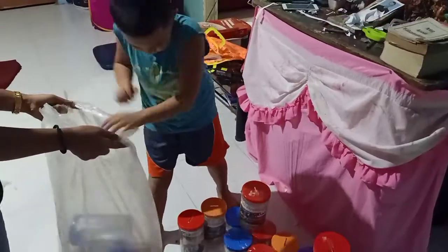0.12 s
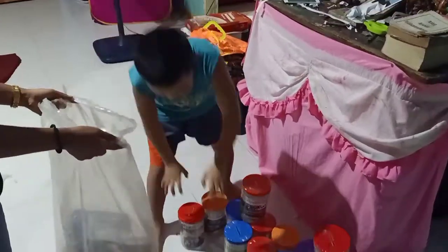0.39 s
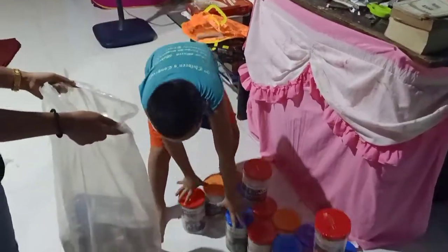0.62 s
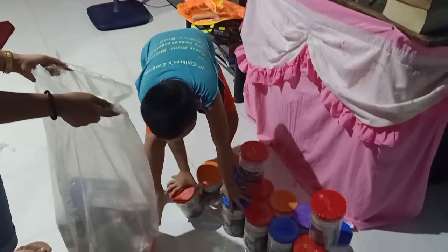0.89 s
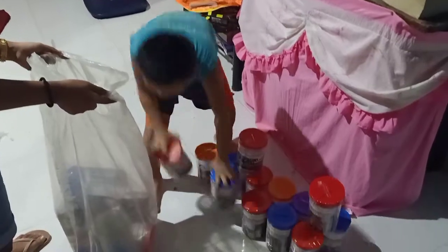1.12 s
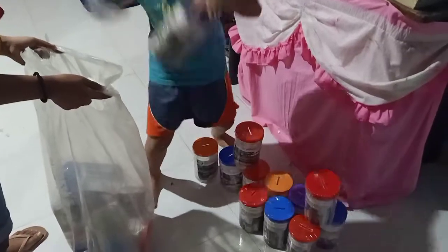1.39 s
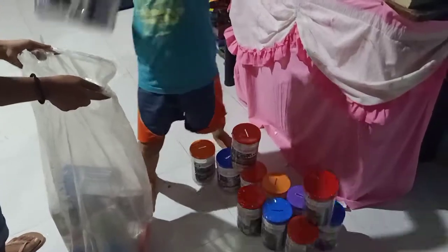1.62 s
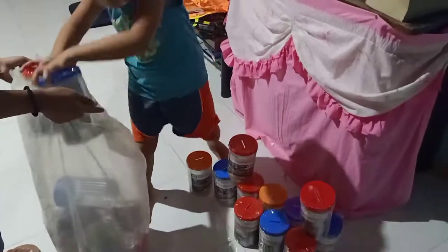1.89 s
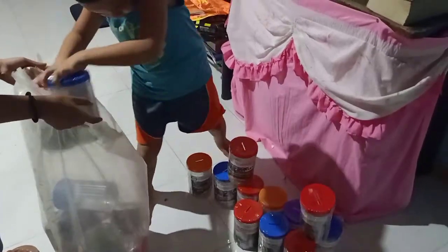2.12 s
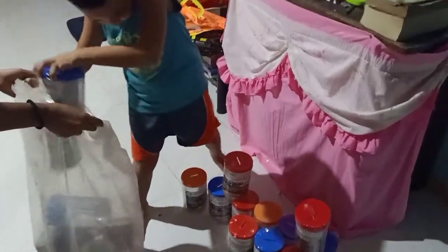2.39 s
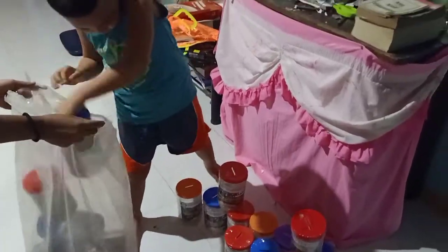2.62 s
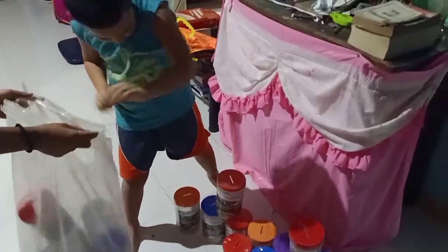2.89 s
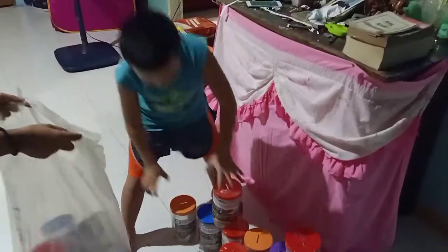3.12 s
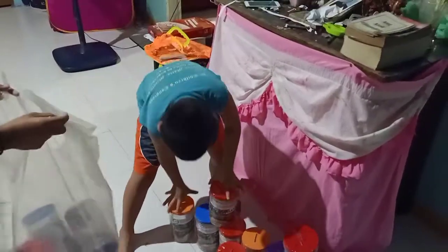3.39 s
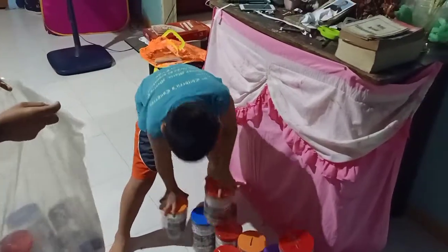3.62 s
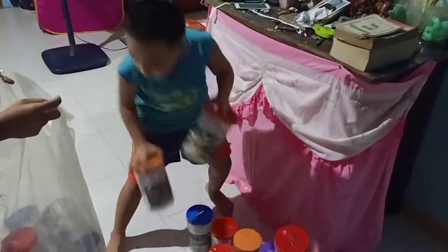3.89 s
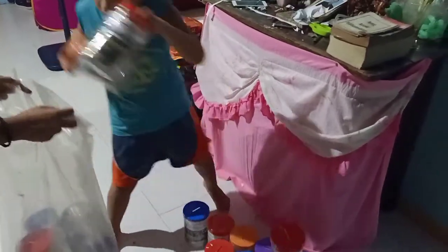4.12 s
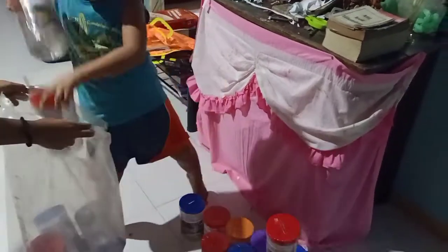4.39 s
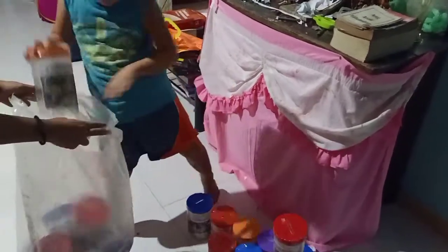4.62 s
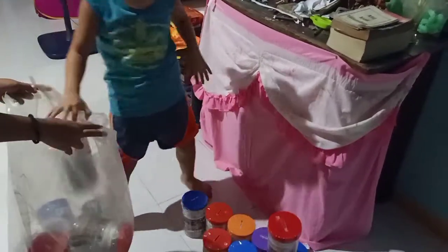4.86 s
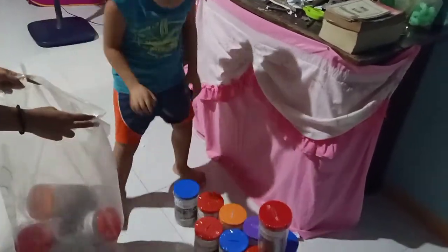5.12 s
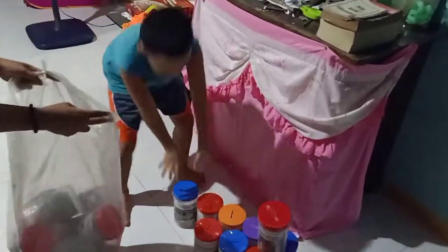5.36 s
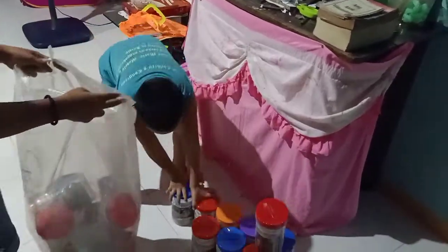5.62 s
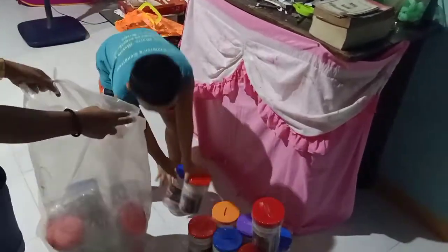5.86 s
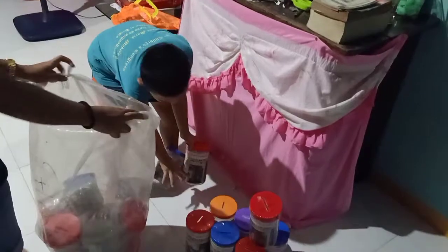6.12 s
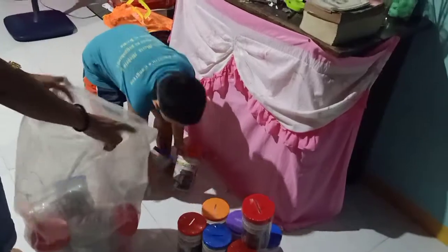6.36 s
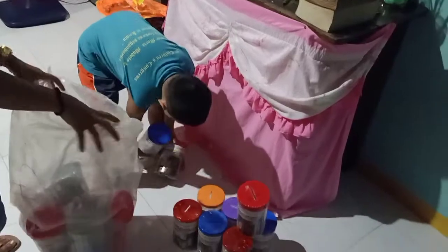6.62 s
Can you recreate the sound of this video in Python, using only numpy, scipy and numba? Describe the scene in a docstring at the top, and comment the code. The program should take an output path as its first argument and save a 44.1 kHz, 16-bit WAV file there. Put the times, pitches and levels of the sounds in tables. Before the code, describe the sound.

Hollow plastic knocks come in uneven clusters as lidded jars drop into a rustling bag indoors, with short rattles and soft floor thuds.

```python
"""A fan hisses far off and a thin plastic bag crackles; then empty plastic jars, picked up from a tiled floor,
knock as they are dropped into the bag in a bare room. Each knock excites damped air, wall and lid modes and a
crack of noise; touching jars hum through a gliding resonator, and the film is filtered random clicks.
The load and bare feet push low swells from the floor; decaying noise makes the room.
A hand cups the left microphone port and shifts its grip, moving a resonance and shading the treble."""
import sys
import numpy as np
from scipy import signal
from scipy.fft import rfft, irfft
from scipy.io import wavfile
from scipy.ndimage import uniform_filter1d
from numba import njit

SR = 44100
rng = np.random.default_rng(int(sys.argv[2]) if len(sys.argv) > 2 else 0)


def amplitude_ratio(level_db):
    """Convert a level in decibels to the matching linear amplitude (field) ratio."""
    exponent = np.asarray(level_db, float) / 20
    return 10 ** exponent


def store_wav(level_fs):
    """Save 16-bit WAV to argv[1]."""
    pcm = np.round(np.clip(np.atleast_2d(level_fs), -1, 1) * 32767)
    wavfile.write(sys.argv[1], SR, pcm.T.astype(np.int16))


N = 297454

# Blows on the jars. Each row: start in seconds, level in dB, pitch of the hollow air ring in Hz,
# wall pitch in Hz, hardness as the level of the crack relative to the blow in dB.
BLOWS = [(0.148, -15, 624, 990, 0.5), (0.15, -18, 311, 623, -4), (0.169, -20, 363, 1020, -20),
         (0.187, -13.5, 412, 1247, -9.5), (0.22, -20.5, 417, 497, 2), (0.273, -20, 417, 880, -10),
         (0.387, -36.5, 462, 580, 19), (0.428, -24, 273, 703, 2), (0.831, -40.5, 290, 1100, -11),
         (1.074, -37.5, 323, 579, -18), (1.116, -29, 339, 600, -6), (1.141, -28.5, 325, 495, -9),
         (1.17, -17.5, 331, 520, -7), (1.199, -20, 341, 520, -8), (1.226, -27.5, 351, 760, -9),
         (1.252, -21, 349, 513, -8), (1.295, -34, 330, 766, -1), (1.338, -33, 334, 760, -25),
         (1.824, -28, 413, 710, 0.5), (2.097, -30, 788, 1080, -4), (2.468, -33.5, 402, 493, -22),
         (2.64, -26, 440, 1026, 16), (2.659, -26.5, 398, 547, 12.5), (2.98, -28, 613, 760, 6),
         (3.001, -24, 392, 545, -3), (3.058, -35, 410, 495, 6.5), (3.262, -37.5, 372, 1120, 6.5),
         (3.4, -37, 396, 490, -7), (3.46, -35, 325, 970, -11), (3.578, -29.5, 340, 536, -2),
         (3.618, -27.5, 356, 494, -29), (3.72, -26, 299, 590, -14), (3.746, -33.5, 353, 570, 1),
         (3.807, -48, 333, 1140, -1), (4.247, -40, 302, 500, 0), (4.289, -16.5, 980, 685, 4),
         (4.295, -17, 397, 990, 2.5), (4.337, -22.5, 271, 937, 16), (4.356, -17.5, 396, 1090, -25),
         (4.72, -23.5, 392.5, 944, 5.5), (4.729, -14.5, 419, 1207, -1.5), (5.03, -14, 369, 580, -9),
         (5.066, -10, 422, 487, -1), (5.076, -19, 420, 500, -11), (5.088, -17, 354, 493, -28),
         (5.126, -19.5, 358, 503, -17), (5.1927, -6.5, 893, 996, -4.5), (5.194, -25, 418, 580, 7.5),
         (5.202, -11, 423.4, 827, -27), (5.222, -18, 362, 1057, -8), (5.251, -23, 415, 580, -15),
         (5.484, -16.5, 392, 748, -5), (5.839, -22, 385, 850, 6), (5.846, -9, 379, 1140, -12.5),
         (6.168, -30, 357, 550, -2.5), (6.262, -38, 356, 595, -11), (6.439, -7.5, 418, 540, -10),
         (6.442, -21, 534, 1017, -16), (6.459, -12.5, 404.5, 535, -20), (6.642, -26, 371, 532, 3)]


def rms_one(x):
    """Normalization: divides a signal by its root mean square."""
    return x / np.sqrt(np.mean(x ** 2) + 1e-20)


def in_time(rows):
    """Linear interpolation: reads the columns of a timed curve at every sample."""
    s, *columns = np.transpose(rows)
    return [np.interp(np.arange(N) / SR, s, column) for column in columns]


def at_hz(points, hz):
    """Logarithmic frequency scale: interpolates a spectrum evenly per octave."""
    points_hz, values = np.transpose(points)
    return np.interp(np.log(hz + 1), np.log(points_hz), values)


def convolve(x, response):
    """Linear superposition: convolves with an impulse response, cut to the scene's length."""
    return signal.fftconvolve(np.atleast_2d(x), np.atleast_2d(response), axes=1)[:, :N]


def colour(x, spectrum):
    """Minimum phase: folding the cepstrum gives a causal filter with the wanted magnitude."""
    level_db = at_hz(spectrum, np.fft.rfftfreq(4096, 1 / SR))
    cepstrum = irfft(np.log(amplitude_ratio(level_db)))
    cepstrum[1:2048] *= 2
    cepstrum[2049:] = 0
    return convolve(x, irfft(np.exp(rfft(cepstrum))))


def drift(rate_hz):
    """Low-pass random process: a double pole leaves slow wandering of spread 1."""
    pole = np.exp(-80 * np.pi * rate_hz / SR)   # computed at every 40th sample
    noise = rng.standard_normal(N // 40 + 2002)
    slow = signal.lfilter([1], [1, -2 * pole, pole * pole], noise)[2000:]
    return np.interp(np.arange(N) / 40, np.arange(len(slow)), rms_one(slow))


def grains(per_s, spread_db):
    """Poisson-like impulses: random clicks with exponential sizes in dB, scaled to rms 1."""
    sizes = amplitude_ratio(spread_db * np.minimum(rng.exponential(1, N), 4.0)) * rng.choice([-1, 1], N)
    return rms_one(sizes * (rng.random(N) < per_s / SR))


def stereo(mid, side):
    """Interchannel coherence: sum and difference of unrelated signals set the likeness per band."""
    # Left-right likeness. Each row: frequency in Hz, correlation from -1 to 1.
    likeness = [(60, 0.69), (200, 0.96), (400, 0.96), (640, 0.27), (1000, 0.38), (1400, -0.35),
                (3000, 0.031)]
    alike = np.clip(at_hz(likeness, np.fft.rfftfreq(len(mid), 1 / SR)), -1, 1)
    mid = rfft(mid) * np.sqrt(1 + alike)
    side = rfft(side) * np.sqrt(1 - alike)
    return irfft([mid + side, mid - side]) / np.sqrt(2)


def bursts(rows, rise_db_per_s):
    """Exponential envelopes: each row rises up to its moment, holds, then falls at its own rate."""
    t = np.arange(0, N + 32, 32) / SR   # every 32nd sample
    s, held, db, dies = np.transpose(rows)[:4, :, None]
    rise = rise_db_per_s * np.maximum(s - t, 0)
    fall = dies * np.maximum(t - s - held, 0)
    return amplitude_ratio(db - rise - fall)


def per_sample(v):
    """Linear interpolation: from every 32nd sample to every sample."""
    return np.interp(np.arange(N) / 32, np.arange(len(v)), v)


def modes(table, hz, draw, t, spread_db, detune):
    """Modal superposition: dying sines, of varied strength and pitch above the first mode."""
    total = 0
    for k, (ratio, level_db, t60) in enumerate(table):
        varied = k > 0
        envelope = amplitude_ratio(level_db + spread_db * varied * draw[k] - 60 * t / t60)
        mode_hz = ratio * hz * (1 + detune * varied * draw[-k])
        total = total + envelope * (-1) ** k * np.sin(2 * np.pi * mode_hz * t)
    return total


@njit
def moving_ring(clicks, hz, radius, rate):
    """Two-pole resonance: a damped oscillator whose pitch may move."""
    out = np.zeros(len(clicks))
    for i in range(2, len(clicks)):
        turn = 2 * radius * np.cos(2 * np.pi * hz[i] / rate)
        out[i] = clicks[i] + turn * out[i - 1] - radius ** 2 * out[i - 2]
    return out


def resonance(x, hz, width_hz):
    """Band-pass resonance: a pole pair of gain 1 on top, whose centre may move."""
    r = np.exp(-np.pi * width_hz / SR)
    driven = signal.lfilter([(1 - r * r) / 2, 0, (r * r - 1) / 2], [1], x)
    return moving_ring(driven, hz + np.zeros(N), r, SR)


def fan():
    """Broadband flow noise: far, smooth air noise with a slight drift in level."""
    # Fan spectrum. Each row: frequency in Hz, level in dB.
    spectrum = [(30, 7), (100, -1), (200, -3.5), (500, -2), (1200, -4.5), (2400, -1.5), (4000, -7.5),
                (6000, -15), (9000, -10.5), (16000, -21)]
    air = colour(stereo(*rng.standard_normal((2, N))), spectrum)
    return amplitude_ratio(-45 + 0.22 * drift(0.81)) * rms_one(air)


def bag():
    """Crackling as impulsive noise: film snaps in clumped clicks, wide folds lower, heavy creases duller."""
    # Film pulled, shaken or brushed. Each row: moment of full level in seconds, hold in seconds,
    # crackle in dB, fall in dB per second, wide folds relative to the crackle in dB.
    pulls = [(0, 0.1, -42.5, 612, 8.5), (0.154, 0.0057, -38, 496.5, 9), (0.189, 0.0065, -33.5, 300, 14),
             (.24, 0.0085, -38.5, 168, 12), (0.39, 0.0027, -29, 800, 9.5), (.42, .09, -52.5, 190, 11),
             (1.125, .02, -55, 100, 17), (1.837, 0.24, -43.5, 250, 7.5), (2.2, 0.22, -48, 9, 8),
             (2.645, .12, -45.5, 226, 14.5), (2.91, .06, -45.5, 202, 7), (2.983, 0.0029, -39, 232, 10.5),
             (3.079, .005, -38.5, 400, 13.5), (3.12, 0.14, -47, 100, 10.5), (3.25, 0.16, -46, 97, 12),
             (3.399, 0.024, -41.5, 103, 12), (3.588, 0.0067, -40, 161, 9.5), (3.813, .005, -47.5, 132, 12),
             (4.19, .05, -55, 100, 13.5), (4.27, 0.045, -46.5, 200, 14), (4.345, .005, -46, 53, 6),
             (4.62, 0.11, -49.5, 100, 8), (4.73, 0.054, -38, 72, 10.5), (5.05, 0.014, -43.5, 170, -5),
             (5.16, 0.0045, -51, 600, 15), (5.205, .07, -48.5, 100, 11.5), (5.29, 0.18, -45, 102, 7),
             (5.46, 0.0039, -42, 234, 11), (5.5, .02, -53, 17, 1), (5.82, 0.022, -45, 200, 3.5),
             (5.852, 0.01, -38.5, 124, 13), (6.05, 0.59, -52.5, 100, 2), (6.66, 0.018, -44, 250, 9.5)]
    # A weight lands in the bag or drags it. Each row: moment of full level in seconds, hold in seconds,
    # heavy creasing in dB, fall in dB per second.
    landings = [(.158, 0.0013, -18.5, 900), (.195, .005, -24.5, 200), (.245, .005, -31, 230),
                (.43, 0.026, -29, 322), (1.18, 0.11, -44, 150), (1.84, 0.0087, -66, 150),
                (2.105, 0.0043, -44, 272), (2.648, .005, -25, 144), (2.76, 0.026, -36.5, 150),
                (2.988, .005, -35, 124), (3.26, 0.018, -49, 57), (4.3, .005, -22.5, 300),
                (4.347, 0.0022, -15, 400), (4.735, 0.045, -27.5, 220), (5.075, 0.0016, -19, 500),
                (5.16, .005, -40, 900), (5.29, 0.079, -37.5, 100), (5.505, 0.0082, -33, 248),
                (5.85, 0.0065, -18, 232), (6.447, .005, -39, 200), (6.67, 0.012, -40, 348)]
    # Spectra of the thin film, its wide folds and its heavy creases. Each row: frequency in Hz, level in dB.
    film_spectrum = [(100, -58), (1500, -33), (3000, 0), (4000, 4), (6000, 3.5), (10000, 2.5), (16000, 0.5)]
    fold_spectrum = [(100, -43), (1000, -29.5), (1800, 2), (2500, 1), (3200, 1.5), (5000, -46), (16000, -8)]
    crease_spectrum = [(60, -22), (130, -4.5), (300, -0.5), (1000, 1), (1600, -4), (2600, -10),
                       (16000, -41)]
    pull_rise, landing_rise = 346, 2501   # dB per second

    # within 14 ms after a knock the film rises as fast as a landing
    since = np.array(pulls)[:, :1] - np.array(BLOWS)[:, 0]
    jolted = np.any((since > 0) & (since < 0.014), axis=1, keepdims=True)
    moves = bursts(pulls, np.where(jolted, landing_rise, pull_rise))
    crackle = per_sample(moves.max(axis=0)) + amplitude_ratio(-75)
    crinkle = per_sample((moves * amplitude_ratio(np.array(pulls)[:, -1:])).max(axis=0))
    crease = per_sample(bursts(landings, landing_rise).max(axis=0))
    crease = crease + amplitude_ratio(-2.5) * crackle   # light creases go with all crackle

    clumps = drift(30)
    film = colour(grains(1400 * amplitude_ratio(4.2 * clumps), spread_db=5.5), film_spectrum)[0]
    folds = colour(grains(1300 * amplitude_ratio(3.0 * clumps), spread_db=4.0), fold_spectrum)[0]
    creases = colour(grains(1200 * amplitude_ratio(3.0 * drift(15)), spread_db=1.5), crease_spectrum)[0]
    thin = amplitude_ratio(7.5) * crackle * rms_one(film)
    wide = amplitude_ratio(-8) * crinkle * rms_one(folds)
    heavy = amplitude_ratio(-2.5) * crease * rms_one(creases)
    return thin + wide + heavy


def snaps():
    """Impulsive buckling: single folds of film pop as noise that dies in milliseconds."""
    # Single snaps of the film. Each row: start in seconds, level in dB.
    pops = [(0.1475, -43), (0.184, -44), (0.383, -40), (0.931, -54), (1.1178, -49.5), (1.3093, -58),
            (1.8223, -50.5), (2.638, -42.5), (2.979, -44.5), (3.058, -41), (3.8085, -46.5), (4.2183, -66),
            (4.2463, -50), (4.274, -43), (4.72, -46), (5.028, -43.5), (5.1936, -41.5), (5.8524, -38),
            (6.2475, -53.5), (6.3945, -52.5), (6.4307, -51)]
    # Snap spectrum. Each row: frequency in Hz, level in dB.
    spectrum = [(100, -48), (1500, 10), (4000, 4), (8000, 1), (16000, 7.5)]
    t, out = np.arange(SR // 50) / SR, np.zeros(N + SR // 50)
    for (s, db), hiss in zip(pops, rng.standard_normal((len(pops), len(t)))):
        at = round(s * SR)
        out[at:at + len(t)] += amplitude_ratio(db + 18.5 - 60 * t / 0.027) * hiss
    return colour(out[:N], spectrum)[0]


def knocks():
    """Impact excitation: a blow swells the air modes, strikes walls and lid and leaves a noisy crack."""
    # Modes of the jar's air, walls and lid. Each row: ratio to the part's pitch, level in dB,
    # time to die by 60 dB in seconds.
    air_modes = [(1.0, 3, 0.076), (0.827, -11, 0.076), (1.27, -6, 0.11)]
    wall_modes = [(1.0, 4, 0.043), (0.77, -16.5, 0.019), (1.192, 7, 0.0092), (2.2, -6.5, 0.021),
                  (1.486, -8, 0.041), (0.69, -7.5, 0.098)]
    lid_modes = [(1.0, 3, 0.014), (.74, 0, 0.045), (.86, 4.5, 0.01), (1.08, 8.5, 0.006),
                 (1.18, -20, 0.0093), (1.27, -6.5, 0.013), (1.37, 0.5, 0.02), (1.75, 0, 0.018)]
    # Crack spectrum. Each row: frequency in Hz, level in dB.
    crack_spectrum = [(100, -30), (900, -3), (1600, 3.5), (2500, 2), (3300, 2), (5000, -7), (7000, -16.5),
                      (16000, -11)]
    flank_hz, lid_hz = 520, 2148

    t = np.arange(SR // 4) / SR
    luck = rng.normal(0, 1, (len(BLOWS), 3, 14))
    noise = rng.standard_normal((len(BLOWS), len(t)))
    body, crack = np.zeros(N + len(t)), np.zeros(N + len(t))
    for (s, db, air_hz, wall_hz, crack_db), draw, hiss in zip(BLOWS, luck, noise):
        # walls ring more under a hard blow and where they are stiff, that is high in pitch
        walls_db = -11.5 + 0.67 * crack_db + 9 * np.log2(wall_hz / flank_hz)
        air = modes(air_modes, air_hz, draw[0], t, spread_db=5.0, detune=0.037)
        air = air * (1 - np.exp(-t / 0.002))   # soft contact
        # extra damping in dB per second for each octave above the flank pitch
        air = air * amplitude_ratio(-1800 * max(np.log2(air_hz / flank_hz), 0) * t)
        walls = modes(wall_modes, wall_hz, draw[1], t, spread_db=3.0, detune=0.04)
        lid = modes(lid_modes, lid_hz, draw[2], t, spread_db=3.5, detune=0.017)
        at = slice(round(s * SR), round(s * SR) + len(t))
        body[at] += amplitude_ratio(db - 2.0) * (air + amplitude_ratio(walls_db) * walls + amplitude_ratio(crack_db - 10.0) * lid)
        crack[at] += amplitude_ratio(db + crack_db - 0.5 - 60 * t / 0.034) * hiss
    return body[:N] + colour(crack[:N], crack_spectrum)[0]


def thuds():
    """Damped oscillation: the load in the bag and bare feet push a short low swell from the floor."""
    # Pushes on the floor. Each row: start in seconds, level in dB, pitch in Hz.
    pushes = [(0.174, -36, 232), (0.262, -33, 173), (0.42, -38, 196), (0.789, -47, 191),
              (0.924, -45.5, 191), (1.053, -46, 183), (1.11, -40, 183), (1.84, -37.5, 179),
              (2.638, -25, 206), (2.856, -43, 203), (2.989, -35.5, 186), (3.264, -33.5, 137),
              (3.392, -51, 179), (3.595, -43, 183), (3.747, -52, 183), (4.229, -49, 230), (4.291, -46, 193),
              (4.337, -55, 192), (4.762, -32, 239), (4.896, -45, 166), (4.988, -41, 182), (5.064, -51, 180),
              (5.46, -53, 212), (5.849, -39, 214), (6.338, -51, 173), (6.445, -38, 230), (6.641, -53, 197)]
    t, out = np.arange(SR // 4) / SR, np.zeros(N + SR // 4)
    for s, db, hz in pushes:
        at = round(s * SR)
        swell = amplitude_ratio(db + 3.5 - 60 * t / 0.088) * (1 - np.exp(-t / 0.002))
        out[at:at + len(t)] += swell * np.sin(2 * np.pi * hz * t)
    return out[:N]


def rattle():
    """Driven cavity resonance: dense small touches keep the jar air humming near the loudest one's pitch."""
    # Jars settling against each other. Each row: moment of full level in seconds, hold in seconds,
    # level in dB, fall in dB per second, pitch of the jar air in Hz.
    touches = [(0.198, 0.017, -17, 300, 388), (.25, 0.025, -32, 350, 397), (.46, .01, -42, 150, 318),
               (.83, .05, -48, 58, 345), (1.27, 0.038, -32.5, 124, 342), (1.845, .01, -36.5, 124, 389.6),
               (2.485, .01, -36, 390, 415), (2.657, .175, -26.5, 547, 398.3), (3.008, .11, -24, 500, 404.7),
               (3.32, 0.031, -39, 246, 341), (3.49, .01, -52, 297, 350), (3.614, 0.0064, -28.5, 334, 360),
               (3.73, 0.016, -30, 296, 321), (3.814, 0.0084, -31, 265, 333), (4.31, 0.0035, -27, 302, 406),
               (4.348, 0.0057, -16.5, 283, 365), (4.743, 0.054, -16.5, 350, 400),
               (5.09, 0.011, -18.5, 235, 355.7), (5.225, 0.011, -32.5, 170, 385),
               (5.511, 0.015, -26, 398, 375), (5.548, 0.045, -32.5, 444, 399),
               (5.868, .005, -16.5, 450, 385), (5.915, 0.0066, -29.5, 119, 332),
               (6.185, .01, -38, 107, 358), (6.469, 0.013, -33.5, 500, 400), (6.66, 0.012, -33.5, 250, 378),
               (6.705, 0.027, -35.5, 250, 392)]
    power, rest_power, rest_hz = bursts(touches, 903) ** 2, amplitude_ratio(2 * -58.5), 365
    total = power.sum(axis=0) + rest_power
    # the pitch is the power-weighted mean
    hz = per_sample((np.array(touches)[:, -1] @ power + rest_hz * rest_power) / total)
    hum = moving_ring(grains(400, spread_db=2.0), hz, amplitude_ratio(-60 / (.16 * SR)), SR)   # dies by 60 dB in 0.16 s
    # swells are mostly evened out
    hum = hum / (uniform_filter1d(rms_one(hum) ** 2, size=600) + .05) ** 0.45
    return amplitude_ratio(-7.5) * per_sample(np.sqrt(total)) * rms_one(hum)


def tail():
    """Statistical reverberation: one path of noise dying band by band, with low standing waves."""
    # Decay. Each row: frequency in Hz, time to die by 60 dB in seconds.
    decay = [(100, 0.63), (400, 0.38), (1000, 0.19), (3000, 0.35), (8000, 0.26), (16000, 0.63)]
    # Standing waves. Each row: frequency in Hz, level in dB, time to die by 60 dB in seconds.
    standing = [(130.7, -2.5, 0.22), (183, -0.5, 0.4)]
    t, edges = np.arange(SR // 2) / SR, 45 * 2.0 ** np.arange(0, 9)
    echoes, out = stereo(*rng.standard_normal((2, len(t)))), 0
    for low, high in zip(edges, np.append(edges[1:], 19000)):
        octave = signal.butter(1, [low, high], "band", fs=SR, output="sos")
        band = signal.sosfilt(octave, echoes)
        out = out + band * amplitude_ratio(-60 * t / at_hz(decay, np.sqrt(low * high)))
    out = out * (1 - np.exp(-t / 0.00043))   # quick onset
    out = out / np.sqrt(np.sum(out ** 2) / 2)
    for hz, level_db, t60 in standing:
        out = out + amplitude_ratio(level_db - 47.0 - 60 * t / t60) * np.sin(2 * np.pi * hz * t)
    return out


def room(x, count=5):
    """Time-varying reverberation: jars and bag keep moving, so sound crossfades from path to path."""
    turn = np.arange(N) / SR / .12   # the next path every 0.12 s
    out = 0
    for k in range(count):
        distance = abs((turn - k) % count - count / 2)
        share = np.cos(np.pi / 2 * np.clip(distance, 0, 1))
        out = out + convolve(x * share, tail())
    return out


def scene():
    """Superposition of direct and reverberant fields: the direct sound reaches the right port first."""
    # Spectra of the direct sound and of the sound sent to the room. Each row: frequency in Hz, level in dB.
    direct_spectrum = [(100, 2.5), (450, -0.5), (700, -4), (1200, -4.5), (3000, -4), (16000, -5)]
    wet_spectrum = [(100, -4), (220, -5.5), (300, -7), (450, -8), (700, -6), (1200, -1.5), (3000, 1),
                    (16000, 0)]
    sources, near = knocks() + rattle() + thuds() + bag(), snaps()
    direct = colour(sources, direct_spectrum)[0] + near
    # the left port is further away: 11 samples later
    direct = np.array([np.roll(direct, 11) * amplitude_ratio(1.05), direct])
    return direct + room(colour(sources + amplitude_ratio(-3.5) * near, wet_spectrum)) + fan()


def top_cut(x):
    """Nothing passes above the cut-off."""
    return signal.sosfilt(signal.butter(12, 16480, fs=SR, output="sos"), x)


def record(dry):
    """Cavity resonance and shading: the cupped hand lifts or dulls bands on the left port."""
    # Hand round the left port. Each row: time in seconds, hollow pitch in Hz, gain of the hollow in dB,
    # shading of the treble in dB.
    grip = [(0.0, 2000, 8.5, -32), (0.6, 2180, 11, -34), (1.16, 2150, 12, -22), (1.57, 2490, 14, -15),
            (2.38, 2600, 15.5, -22), (2.66, 2660, 13.5, -3), (2.91, 2580, 14, -12.5),
            (3.9, 2700, 13.5, -7.5), (4.18, 2700, 7, 2), (4.52, 2580, 6.5, 1.5), (5.13, 2700, 7.8, 0),
            (5.87, 2400, 8, -0.5), (6.74, 2680, 8, 2)]
    # Upper resonances. Each row: frequency in Hz, width in Hz, gain in dB, share of the hollow's gain,
    # share of the shading.
    upper = [(5120, 660, -31.5, 3, 0.23), (5650, 4800, 2, 0, 1), (13500, 1900, 19, -1.5, 0.89)]
    # Colour of both ports. Each row: frequency in Hz, level in dB.
    port_spectrum = [(25, -28), (90, -15.5), (160, -3), (350, 1.5), (2600, 1), (3300, -7.5), (4400, -6),
                     (5600, 3), (6500, -8), (8000, -20.5), (11000, -21.5), (13000, -25.5), (15300, -28),
                     (15900, -68)]
    left, (hollow_hz, hollow_db, shade_db) = dry[0], in_time(grip)
    left = left + (amplitude_ratio(hollow_db) - 1) * resonance(left, hollow_hz, 747)
    for hz, width_hz, db, of_hollow, of_shade in upper:
        gain = amplitude_ratio(db + of_hollow * hollow_db + of_shade * shade_db)
        left = left + (gain - 1) * resonance(left, hz, width_hz)
    ports = colour(np.array([left, dry[1]]), port_spectrum)
    return top_cut(np.tanh(ports))   # soft limiting


dry = scene()
out = record(dry)
store_wav(out)
```